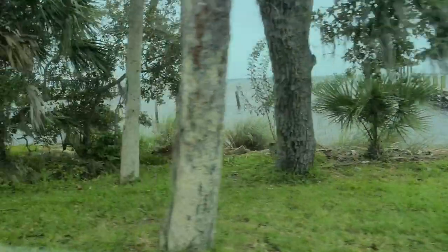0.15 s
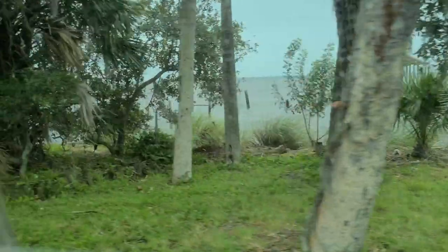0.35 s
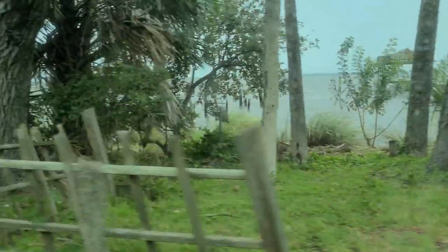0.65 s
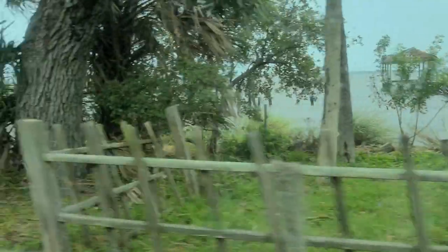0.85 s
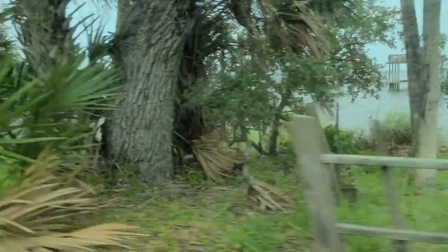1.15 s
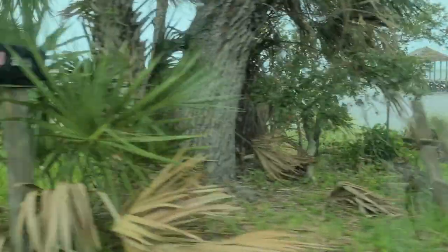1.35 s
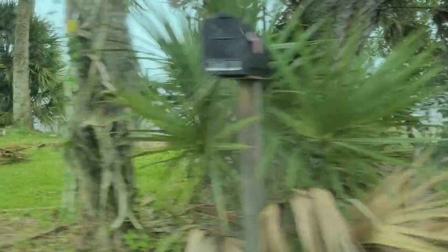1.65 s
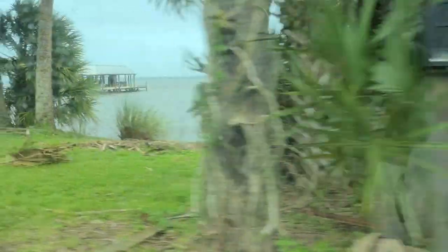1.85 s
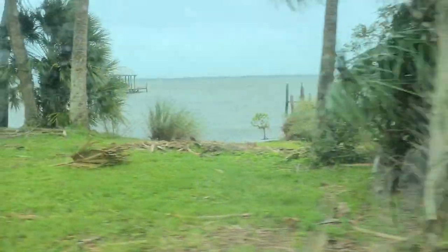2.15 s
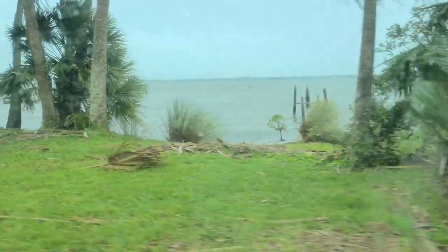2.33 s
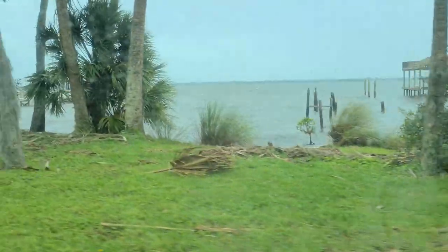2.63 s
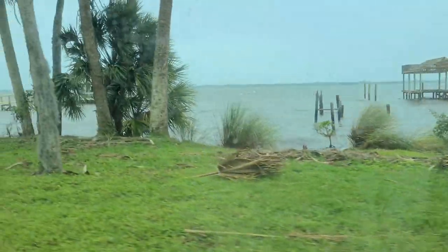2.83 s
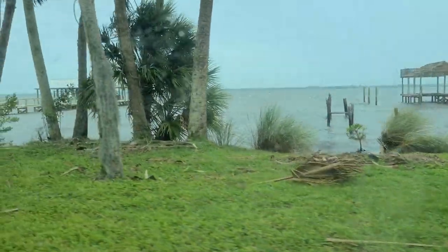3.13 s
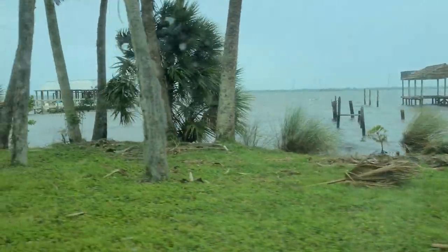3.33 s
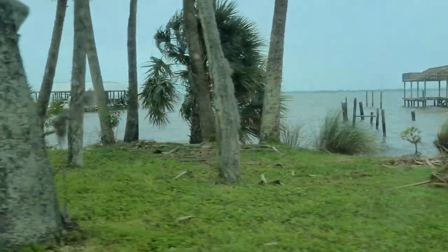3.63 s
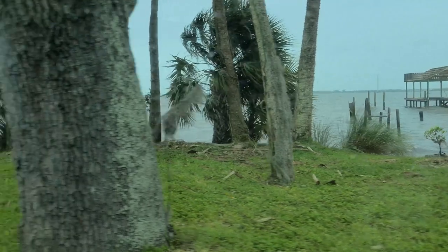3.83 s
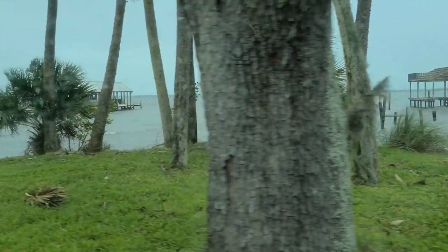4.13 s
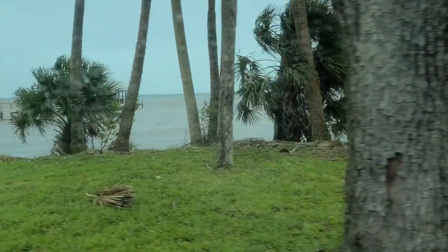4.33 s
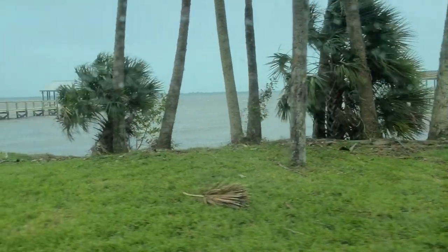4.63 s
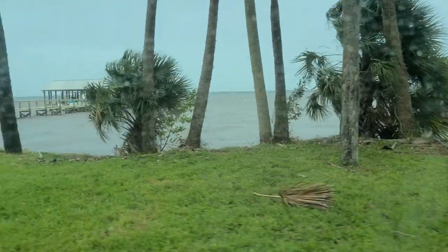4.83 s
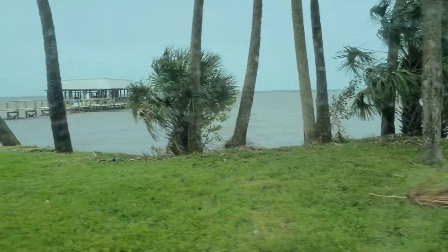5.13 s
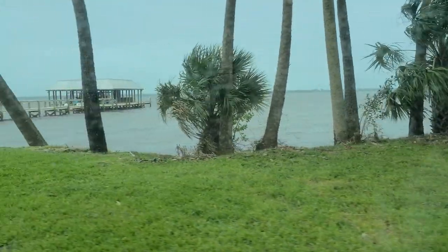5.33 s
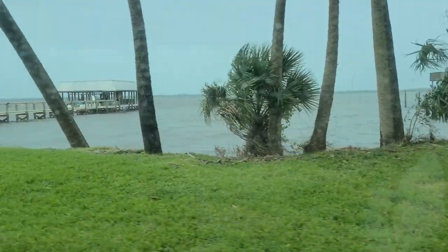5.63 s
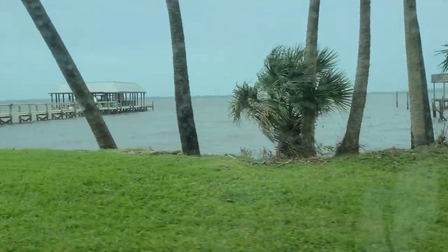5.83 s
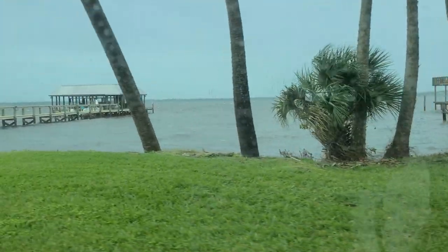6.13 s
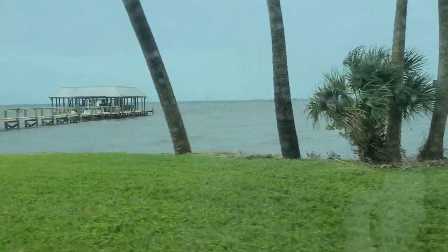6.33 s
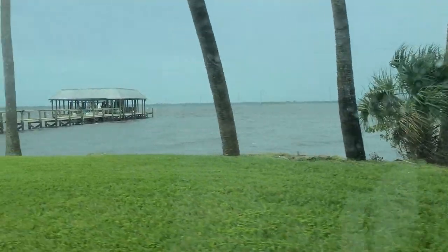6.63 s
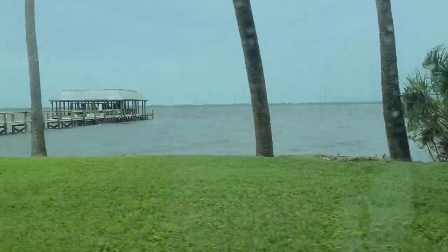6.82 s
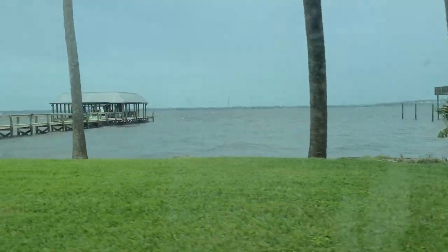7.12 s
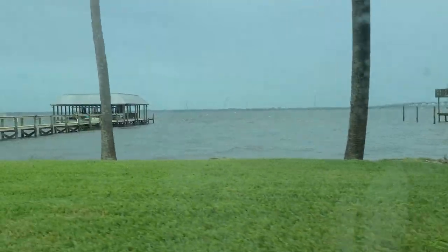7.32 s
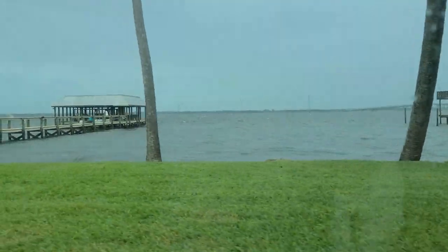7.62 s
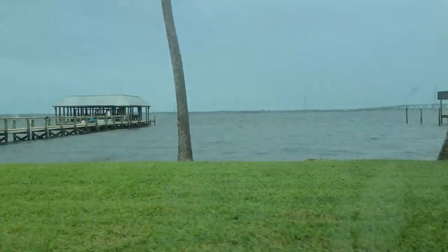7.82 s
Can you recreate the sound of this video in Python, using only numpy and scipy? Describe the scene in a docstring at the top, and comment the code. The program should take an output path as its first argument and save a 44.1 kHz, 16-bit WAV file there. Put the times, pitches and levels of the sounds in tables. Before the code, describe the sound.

Continuous low wind buffeting, heard close from a car cabin passing a grassy shore in a storm. Two very deep wavering throbs swell and fade restlessly beneath a dull growling roar and faint patchy hiss. Blunt puffs of air hit mainly the right side during the first half, the strongest around three seconds. The hiss rises slightly near five seconds, then everything rolls on unsteadily to the end.

```python
"""Inside a slowly moving car with a window ajar, in a storm wind: the cabin air throbs at two wandering low pitches,
each a sine wave with a weak octave, swelling in surges over a restless idle, with a loose rumble around them.
Five bands of patchy noise make the wind that growls and roars round the body and hisses past the gap.
A lumpy noise draught and short, rough-edged swirls puff mostly on the right microphone port."""
import sys
import numpy as np
from scipy import signal
from scipy.fft import rfft, irfft, next_fast_len
from scipy.io import wavfile
from scipy.ndimage import uniform_filter1d, map_coordinates

SR = 44100
rng = np.random.default_rng(int(sys.argv[2]) if len(sys.argv) > 2 else 0)


def store_wav(level_fs):
    """Save 16-bit WAV to argv[1]."""
    pcm = np.round(np.clip(np.atleast_2d(level_fs), -1, 1) * 32767)
    wavfile.write(sys.argv[1], SR, pcm.T.astype(np.int16))


N = 351477  # length in samples, about 8 s

# low wind on the car body: start_s [s], growl_db [dB], roar_db [dB]
BODY_WIND = [(0.04, -26.5, -35), (0.12, -33.5, -36), (0.9, -31.5, -37.5), (1.1, -27.5, -33.5),
             (1.8, -30, -36), (2.3, -29.5, -34), (2.75, -30.5, -34.5), (2.88, -40, -37), (3.0, -28, -34.5),
             (3.22, -20.5, -32), (3.36, -28.5, -33), (3.87, -31, -37), (4.05, -29.5, -32.5),
             (4.15, -27.5, -35.5), (4.3, -26.5, -36), (4.9, -30.5, -34.5), (5.06, -26.5, -34.5),
             (5.6, -31.5, -34.5), (6.4, -27, -33.5), (6.52, -30, -33), (6.76, -25.5, -33.5),
             (7.2, -29.5, -34.5), (7.95, -29.5, -34)]
# colour of the air that strikes the port: pitch_hz [Hz], level_db [dB per Hz, relative]
DRAUGHT_COLOUR = [(7, -27), (16, -11), (28, 5), (50, 0.5), (84, -9), (105, -15.5), (260, -19), (350, -23.5),
                  (460, -56), (770, -120)]


def amp(db):
    """Gain of a level in dB."""
    return 10 ** (np.asarray(db) / 20)


def unit(x):
    """x scaled to an average strength (rms) of 1."""
    return x / np.sqrt(np.mean(x ** 2) + 1e-20)


def along(points, hz):
    """Values read between (Hz, value) points, on a log pitch axis."""
    point_hz, value = np.transpose(points)
    return np.interp(np.log(hz + 1), np.log(point_hz + 1), value)


def curves(rows):
    """One value per sample for each column after the time."""
    start_s, *columns = np.transpose(rows)
    now = np.arange(N) / SR
    return [np.interp(now, start_s, column) for column in columns]


def wobble(rate):
    """A smooth random curve through `rate` random knots a second."""
    coarse = np.arange(0, N + 32, 32)  # worked out at every 32nd sample, then joined by lines
    knots = rng.standard_normal(int(N * rate / SR) + 4)
    smooth = map_coordinates(knots, [coarse * rate / SR])
    return np.interp(np.arange(N), coarse, smooth)


def filtered(x, response):
    """x with each frequency multiplied by response(hz), which may also shift its phase."""
    m = next_fast_len(N + SR // 2)
    hz = np.fft.rfftfreq(m, 1 / SR)
    return irfft(rfft(x, m) * response(hz), m)[..., :N]


def rush(spectrum, patchy_db, channels=2):
    """Rushing air: unrelated noises of one colour, rms 1, sharing patches of random gain."""
    grains = signal.stft(rng.standard_normal((channels, N)), nperseg=512)[2]
    # smooth the random gains over 8 frequency bins and 10 time frames
    patches = uniform_filter1d(rng.standard_normal(grains.shape[1:]), size=8, axis=0)
    patches = uniform_filter1d(patches, size=10, axis=1)
    noise = signal.istft(grains * amp(patchy_db * unit(patches)), nperseg=512)[1][:, :N]
    return unit(filtered(noise, lambda hz: amp(along(spectrum, hz))))


def across_ports(pair):
    """Wind reaches the two ports less alike and further apart in phase, broadly, as the pitch rises."""
    # likeness of the ports: pitch_hz [Hz], likeness [0-1]
    likeness = [(60, 0.9), (300, 0.95), (700, 0.58), (1000, 0.55), (1180, 0.32), (1650, 0.74), (2200, 0.32),
                (2700, 0.17), (3200, 0), (4700, 0.2), (8000, 0), (11000, 0.15)]
    # phase by which the left port leads: pitch_hz [Hz], lead_rad [radians]
    left_lead = [(0, 0), (690, -0.09), (1810, 4.5), (3270, 10), (4390, 15), (5080, 15.5), (5940, 21),
                 (8100, 31), (9300, 29), (15200, 29.5)]
    # level of left over right: pitch_hz [Hz], left_over_right_db [dB]
    side_balance = [(90, -0.5), (500, 0), (770, -3), (1100, -4), (1500, -3), (1900, -4), (2740, -1.9),
                    (5000, 0), (6100, -2.5), (7000, 3.5), (8100, 3), (8600, 7), (9200, -0.5), (11500, 3.5),
                    (15000, 7)]

    def mix_angle(hz):
        return np.arccos(np.clip(along(likeness, hz), 0, 1)) / 2

    def tilt(hz):
        # half of each difference goes to the left; the right gets the opposite half
        half_lead = .5j * np.interp(hz, *np.transpose(left_lead))
        return amp(along(side_balance, hz) / 2) * np.exp(half_lead)

    common, apart = filtered(pair, lambda hz: [np.cos(mix_angle(hz)), np.sin(mix_angle(hz))])
    ports = np.array([common + apart, common - apart])
    return filtered(ports, lambda hz: [tilt(hz), 1 / tilt(hz)])


def wind():
    """Turbulent air growls and roars round the body and hisses past the gap: five bands of noise."""
    # wind past the gap: start_s [s], hiss_db [dB], fizz_db [dB], air_db [dB]
    gap_wind = [(0.04, -38, -51.5, -60), (0.25, -40, -51.5, -61.5), (1.3, -38, -50.5, -59),
                (1.95, -38, -50, -58.5), (2.1, -38.5, -51, -59.5), (2.5, -37.5, -50, -58),
                (2.9, -38, -50, -58.5), (3.28, -36, -49.5, -57), (3.95, -38, -50.5, -56.5),
                (4.5, -37.5, -52, -58), (4.82, -35.5, -48.5, -55), (5.1, -35, -48, -55.5),
                (5.22, -33.5, -46, -54.5), (5.45, -36.5, -50, -57), (5.8, -37, -51, -58.5),
                (6.63, -35.5, -49, -56), (6.9, -36, -48.5, -56), (7.15, -37.5, -51, -59.5),
                (7.95, -37.5, -52, -59.5)]
    # colour of the growl, the lowest band: pitch_hz [Hz], level_db [dB per Hz, relative]
    growl_colour = [(45, -31), (68, -1), (86, -2.5), (108, -8.5), (122, -8.5), (136, -7.5), (160, -17),
                    (200, -36), (400, -120)]
    # colour of the roar: pitch_hz [Hz], level_db [dB per Hz, relative]
    roar_colour = [(100, -38), (150, -6), (195, 1.2), (230, -2.5), (296, -2), (367, -7.5), (443, -5.5),
                   (563, -8), (655, -12), (900, -16), (1170, -23), (1980, -120)]
    # colour of the hiss: pitch_hz [Hz], level_db [dB per Hz, relative]
    hiss_colour = [(440, -20), (750, -3), (883, -4), (1120, 0.5), (1520, -5.5), (2010, -6.5), (2260, -10.5),
                   (3160, -10), (4370, -20.5), (4800, -22), (6240, -42), (10600, -120)]
    # colour of the fizz, above the hiss: pitch_hz [Hz], level_db [dB per Hz, relative]
    fizz_colour = [(2530, -33), (4300, -6.5), (5000, -2.5), (5700, 1.4), (6800, -0.2), (7600, -6.5),
                   (8500, -10), (9200, -23.5), (11700, -35), (19800, -120)]
    # colour of the airy top band: pitch_hz [Hz], level_db [dB per Hz, relative]
    air_colour = [(5060, -34), (8600, -5), (9060, -1.5), (10600, -2.5), (12100, -1.5), (15600, -11)]

    growl_db, roar_db = curves(BODY_WIND)
    hiss_db, fizz_db, air_db = curves(gap_wind)
    flutter, flurry = wobble(16), wobble(9.7)  # shared by bands, so they swell together
    roar_db = roar_db + 0.43 * flurry
    hiss_db = hiss_db + 0.31 * flutter + 0.17 * flurry
    fizz_db = fizz_db + 0.5 * flutter
    air_db = air_db + 0.63 * flutter + 0.74 * wobble(60)

    pair = amp(growl_db) * rush(growl_colour, patchy_db=0.5)
    pair = pair + amp(roar_db) * rush(roar_colour, patchy_db=0.95)
    pair = pair + amp(hiss_db) * rush(hiss_colour, patchy_db=1.02)
    pair = pair + amp(fizz_db) * rush(fizz_colour, patchy_db=1.0)
    pair = pair + amp(air_db) * rush(air_colour, patchy_db=1.1)
    return across_ports(pair)


def port_draught():
    """Air striking the port makes a lumpy low noise."""
    # draught before its share per port: start_s [s], level_db [dB]
    draught_level = [(0, -26.5), (.6, -37), (1.4, -29), (2.7, -29.5), (2.9, -33), (3.3, -19), (3.9, -34.5),
                     (4.3, -29.5), (5.9, -31), (6.9, -33), (7.9, -34)]
    lumps = amp(1.7 * wobble(15))
    noise = rush(DRAUGHT_COLOUR, patchy_db=2.5, channels=1)[0]
    return amp(curves(draught_level)[0]) * unit(lumps * noise)


def port_puffs():
    """Short eddies strike the port: each is a brief swirl of a cycle or two with a rough edge."""
    # strong puffs before their share per port: peak_s [s], swirl_peak_db [dB], pitch_hz [Hz]
    puff_rows = [(1.168, -18, 50.7), (1.345, -14, 73), (1.676, -14, 69), (1.77, -16.5, 57),
                 (1.989, -23, 74), (2.497, -15, 77), (2.653, -17, 55.1), (2.752, -19, 45.4),
                 (3.086, -15.5, 59), (3.177, -5.5, 54.06), (3.308, -12, 46), (3.439, -18, 46.3),
                 (4.229, -14, 57), (4.363, -20, 41), (5.394, -20, 59)]
    fade_s = 0.015  # time in which a puff falls to 1/e either side of its peak
    roughness = .33  # noise beside a swirl of height 1
    edge = rush(DRAUGHT_COLOUR, patchy_db=2.0, channels=1)[0]
    puffs = np.zeros(N)
    t = np.arange(-SR // 8, SR // 8) / SR  # seconds from the peak
    swell = np.exp(-(t / fade_s) ** 2)
    phases = rng.uniform(0, 2 * np.pi, len(puff_rows))
    for (peak_s, peak_db, pitch_hz), phase in zip(puff_rows, phases):
        first = round(peak_s * SR) - SR // 8
        span = slice(first, first + len(t))
        swirl = np.sin(2 * np.pi * pitch_hz * t + phase) + roughness * edge[span]
        puffs[span] += amp(peak_db) * swell * swirl
    return puffs


def surging(rows, idle_db):
    """Gain and pitch in Hz of one throb: surges over a restless idle, the pitch gliding from row to row."""
    rise_db_per_s, fall_db_per_s = 140, 159  # how fast a surge builds and dies
    idle_follows, idle_swing_db = 0.85, 2.5  # dB per dB of growl; size of the random swing

    coarse_s = np.arange(0, N + 128, 128) / SR  # the surges are worked out at every 128th sample
    peak_s, peak_db, pitch_hz = np.transpose(rows)
    after_s = coarse_s - peak_s[:, None]
    slope = np.where(after_s < 0, rise_db_per_s, -fall_db_per_s)
    surge_db = peak_db[:, None] + slope * after_s
    power = np.sum(amp(surge_db) ** 2, axis=0)

    growl_db = curves(BODY_WIND)[0]
    growl_change_db = growl_db - growl_db.mean()
    idle = amp(idle_db + idle_follows * growl_change_db + idle_swing_db * wobble(7.3))
    now = np.arange(N) / SR
    gain = np.sqrt(np.interp(now, coarse_s, power) + idle ** 2)
    return gain, np.interp(now, peak_s, pitch_hz)


def throb(hz, stray, second_db):
    """An unsteady air oscillation of rms 1: eddies push its pitch about, a weak octave rides along."""
    pushed_hz = hz * np.exp(stray * wobble(25))
    turn = 2 * np.pi * np.cumsum(pushed_hz) / SR + rng.uniform(0, 2 * np.pi)
    octave = np.sin(2 * turn + 3 * wobble(6))
    return unit(np.sin(turn) + amp(second_db) * octave)


def cabin():
    """The air in the cabin springs against the gap; it fills both ports alike."""
    # surges of the cabin air, each on one of two throbs: peak_s [s], peak_db [dB], pitch_hz [Hz]
    surge_rows = [(0.029, -11.5, 38), (0.03, -29, 56.3), (0.2, -23.5, 53.8), (0.26, -22, 36.9),
                  (0.429, -22.5, 32.8), (0.55, -19.5, 37.6), (0.58, -24, 54.84), (0.74, -18.5, 35.24),
                  (0.87, -22, 37.4), (1.03, -20.5, 52), (1.06, -24, 38.1), (1.38, -19, 35.9),
                  (1.431, -24.5, 58.1), (1.56, -15.5, 33.87), (1.64, -14, 33.84), (1.78, -19.5, 35),
                  (1.78, -17.5, 49.54), (2.13, -16, 29.83), (2.0, -19.5, 51.1), (2.27, -22, 63.25),
                  (2.401, -31, 53.6), (2.41, -14.5, 33.3), (2.59, -18.5, 53.34), (2.65, -15, 31.75),
                  (2.76, -20, 34), (2.77, -21, 53.7), (3.03, -17, 55), (3.09, -18.5, 38), (3.18, -23, 64.2),
                  (3.3, -16, 53.1), (3.37, -15.5, 32), (3.42, -21, 55), (3.499, -15, 55.8),
                  (3.76, -23, 36.3), (3.91, -18.5, 52), (4.12, -22, 53.07), (4.21, -13.5, 55),
                  (4.34, -17.5, 33.8), (4.4, -16.5, 51.85), (4.65, -20, 57.9), (4.669, -15, 32.1),
                  (4.86, -22, 49.7), (4.96, -20, 30.92), (5.1, -17.5, 54.85), (5.21, -19.5, 36.88),
                  (5.35, -20, 33), (5.39, -12.5, 57), (5.56, -28, 30.02), (5.64, -14, 53.73),
                  (5.72, -17.5, 35), (5.83, -23.5, 52), (6.0, -20.5, 32.86), (6.14, -24, 56),
                  (6.16, -15.5, 37), (6.4, -17, 56.13), (6.55, -20.5, 54), (6.72, -12.5, 56.9),
                  (6.77, -22, 31), (6.91, -23, 31), (7.06, -22.5, 36.08), (7.19, -17, 53.7),
                  (7.21, -16.5, 30), (7.35, -26, 54.1), (7.52, -17, 36), (7.52, -22, 57),
                  (7.74, -22.5, 35.84), (7.79, -20, 58.06)]
    # colour of the loose rumble: pitch_hz [Hz], level_db [dB per Hz, relative]
    rumble_colour = [(7.1, -34), (12, 0), (32, 3.5), (48, 8), (63, 2), (108, -12.5), (130, -14), (170, -50),
                     (290, -120)]
    split_hz = 44  # surges under this pitch ring the deep throb, the others the upper one
    deep_rows = [row for row in surge_rows if row[2] < split_hz]
    upper_rows = [row for row in surge_rows if row[2] >= split_hz]

    deep_gain, deep_hz = surging(deep_rows, idle_db=-27.5)
    upper_gain, upper_hz = surging(upper_rows, idle_db=-30)
    deep = deep_gain * throb(deep_hz, stray=.16, second_db=-39)
    upper = upper_gain * throb(upper_hz, stray=.13, second_db=-22.0)
    # the rumble swells with both throbs, 7 dB under their joint gain
    rumble_gain = amp(-7.0) * np.hypot(deep_gain, upper_gain)
    rumble = rumble_gain * rush(rumble_colour, patchy_db=1.0, channels=1)[0]
    return deep + upper + rumble


def scene():
    """The wind across both ports, the draught and puffs mostly on the right, the cabin air in both."""
    port_share = np.array([[-.12], [.9]])  # left (upside down), right
    return wind() + (port_draught() + port_puffs()) * port_share + cabin()


def record(dry):
    """The microphone weakens the deepest air and keeps nothing from its band limit up."""
    top_hz, low_corner_hz = 15740, 9
    return filtered(dry, lambda hz: (hz < top_hz) * hz ** 2 / (hz ** 2 + low_corner_hz ** 2))


dry = scene()
out = record(dry)
store_wav(out)
```